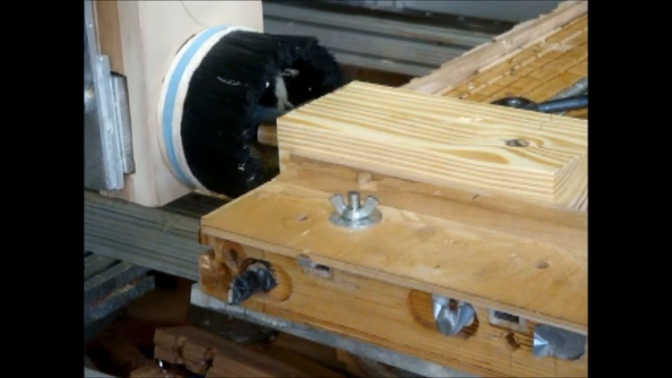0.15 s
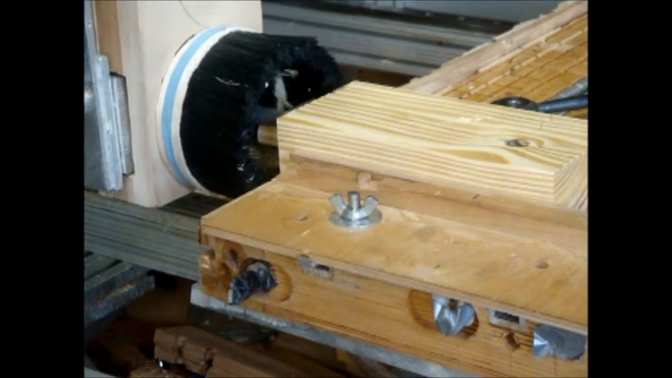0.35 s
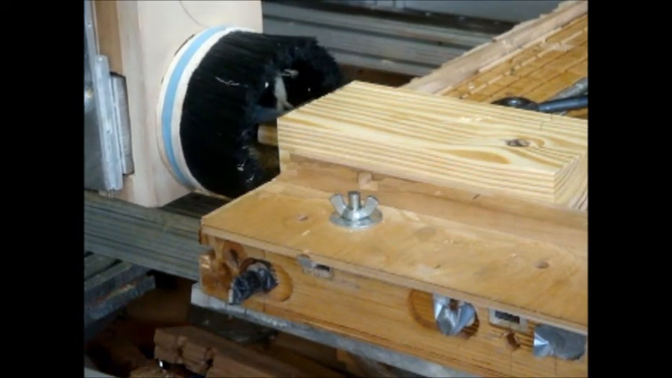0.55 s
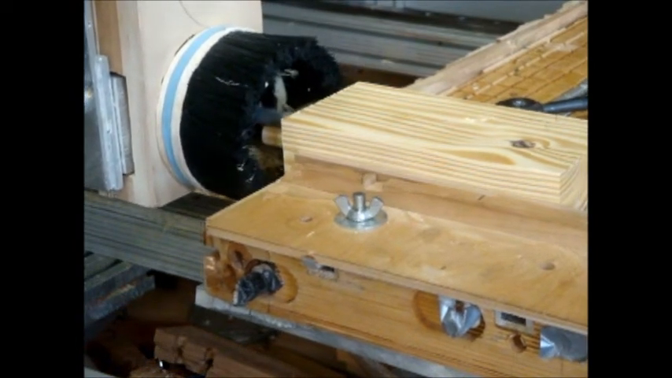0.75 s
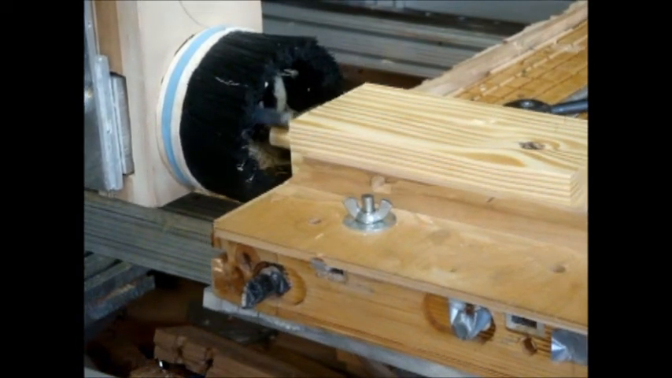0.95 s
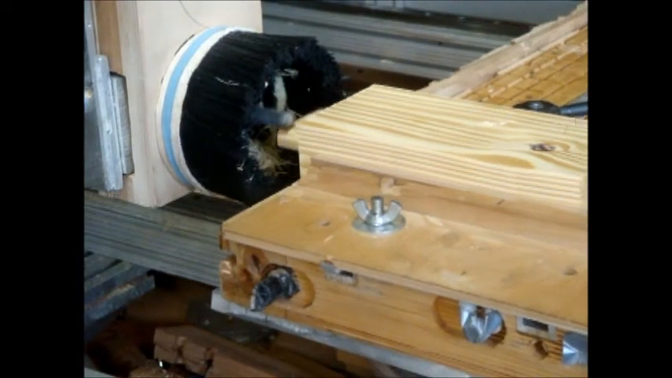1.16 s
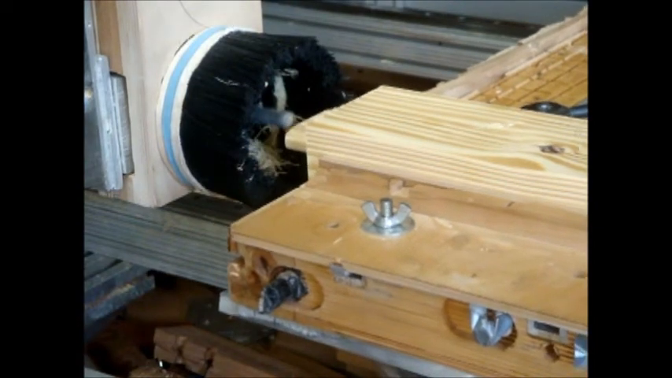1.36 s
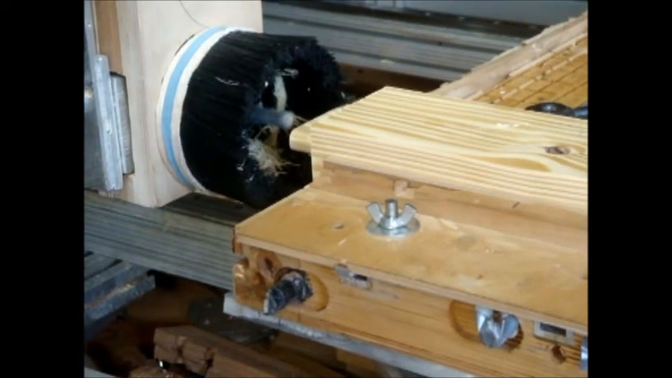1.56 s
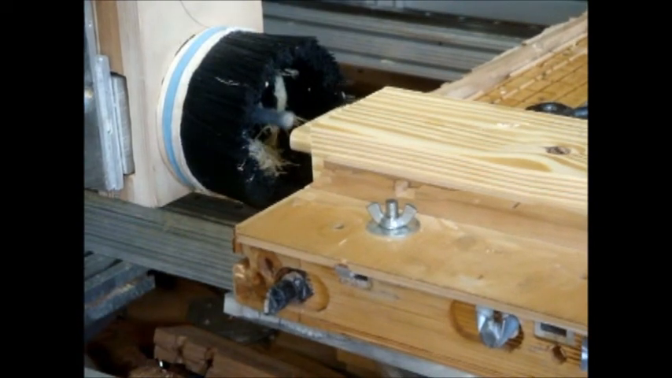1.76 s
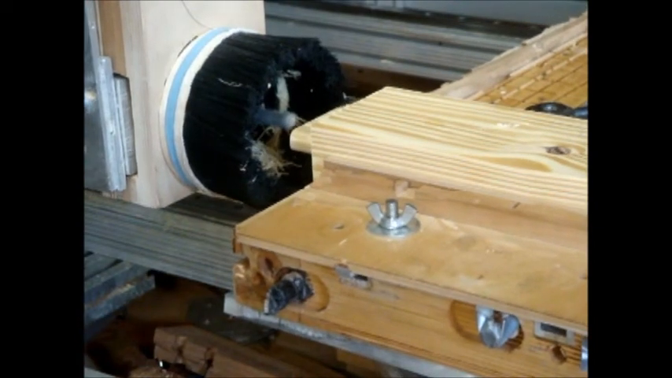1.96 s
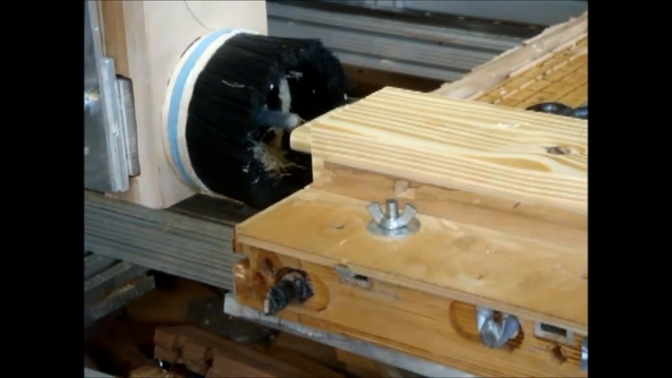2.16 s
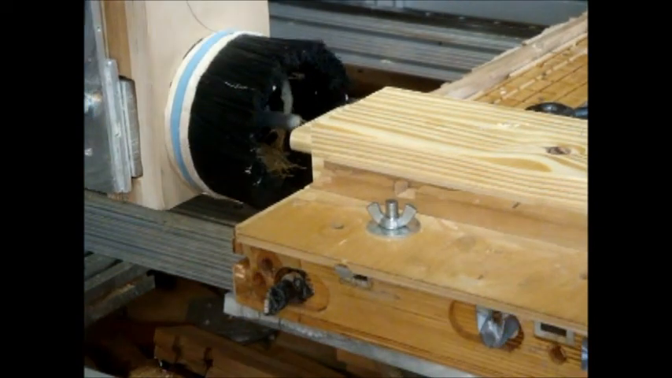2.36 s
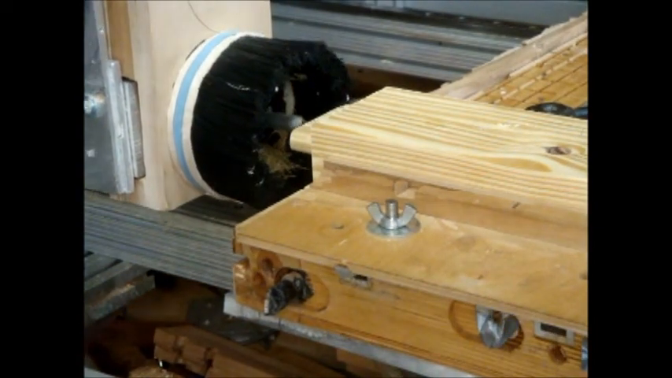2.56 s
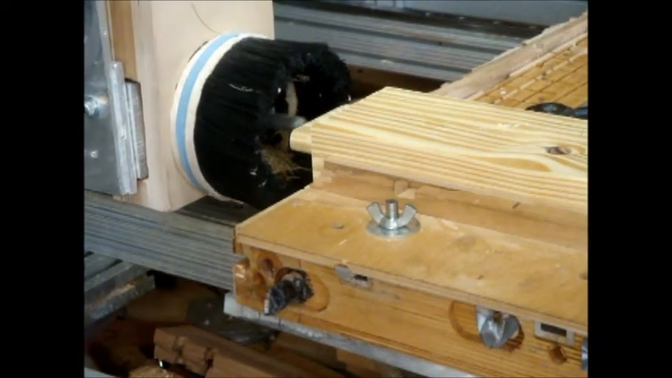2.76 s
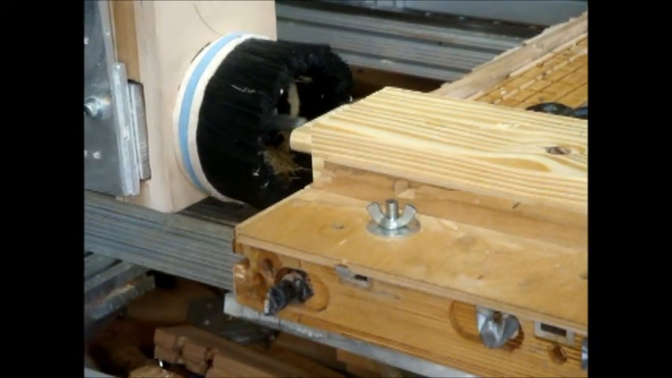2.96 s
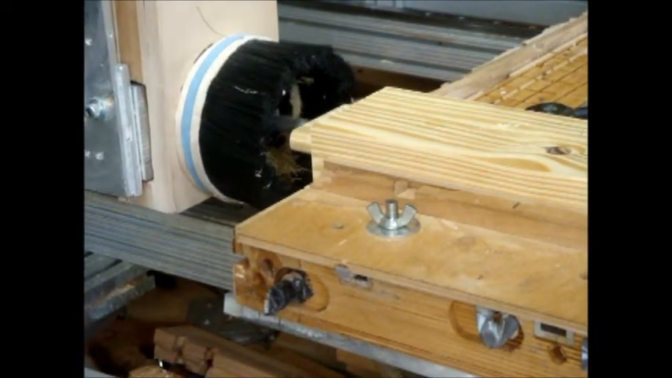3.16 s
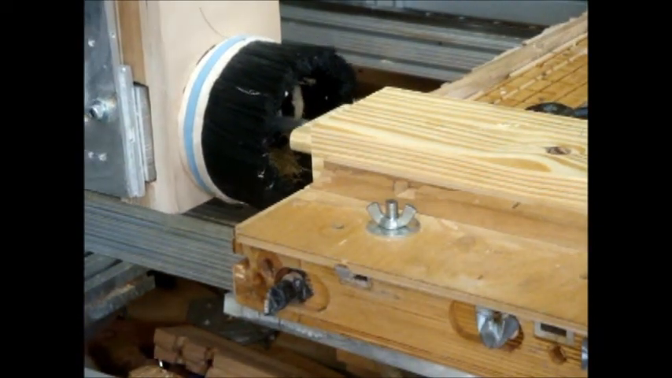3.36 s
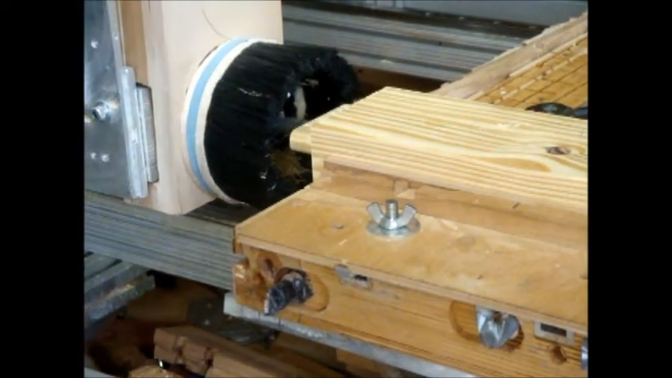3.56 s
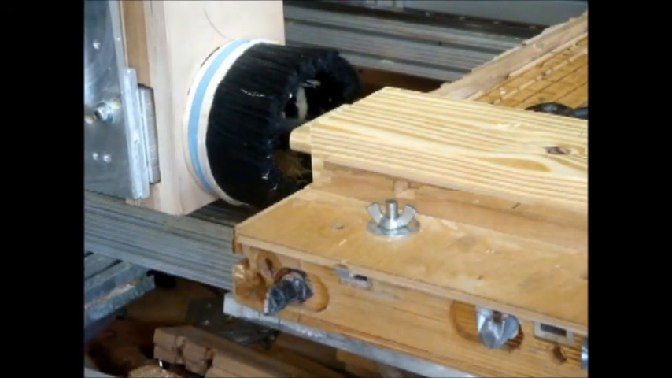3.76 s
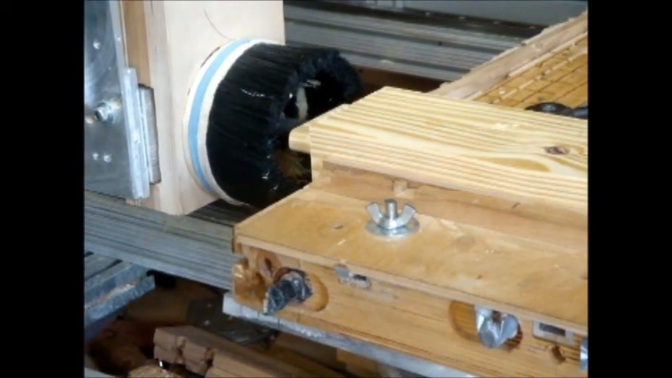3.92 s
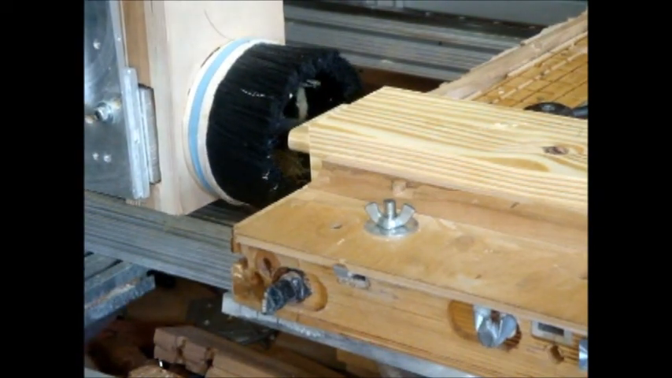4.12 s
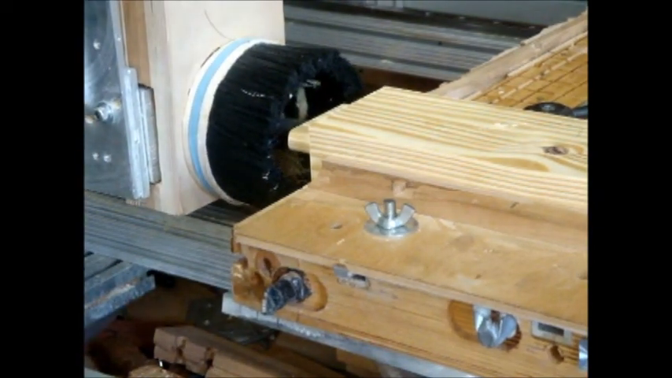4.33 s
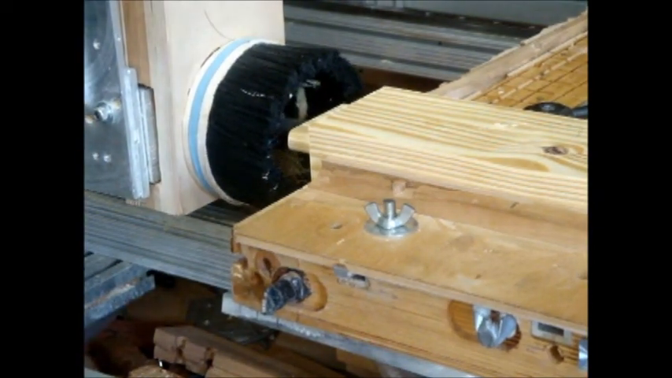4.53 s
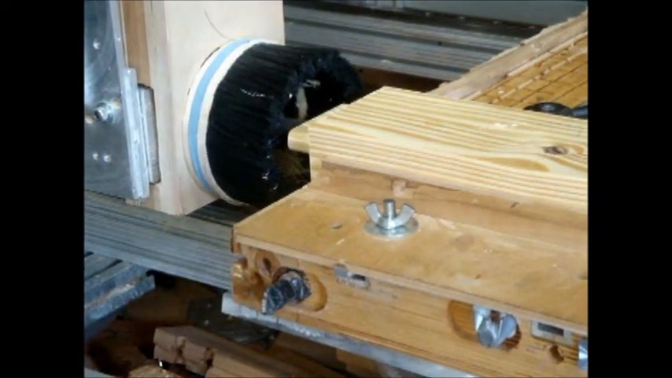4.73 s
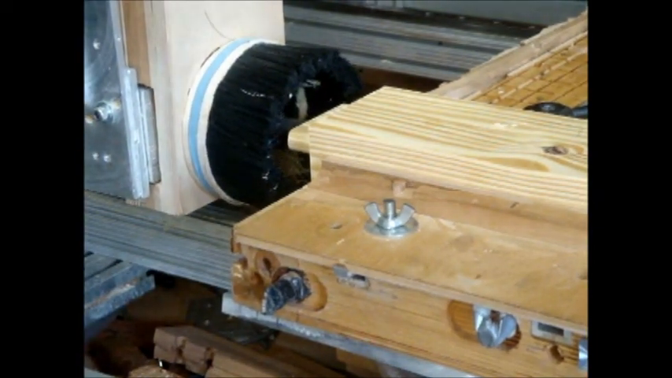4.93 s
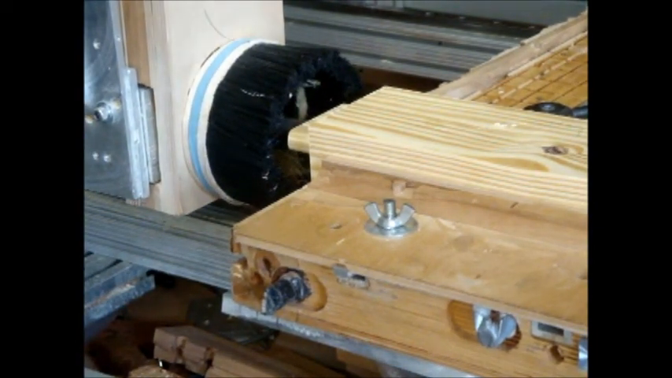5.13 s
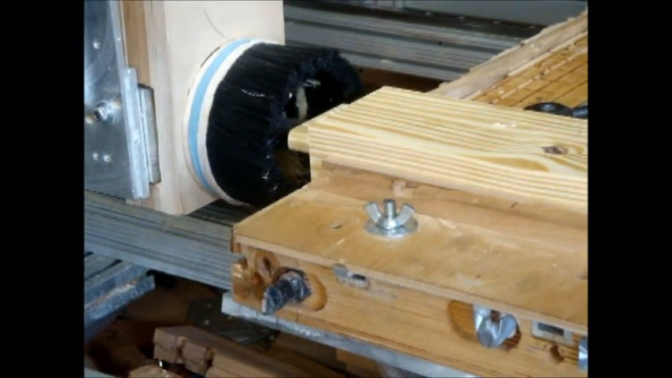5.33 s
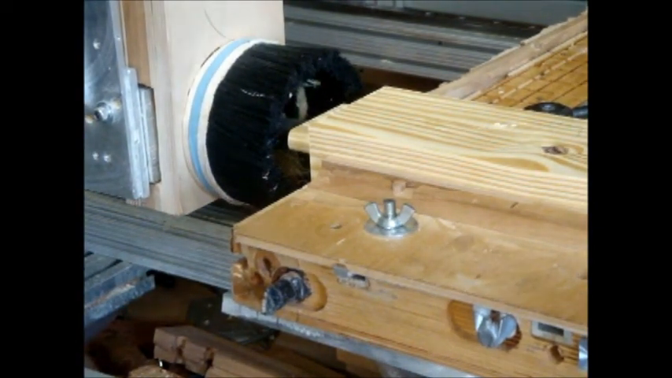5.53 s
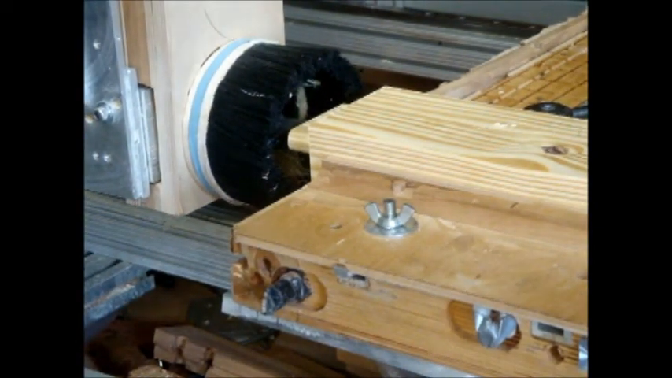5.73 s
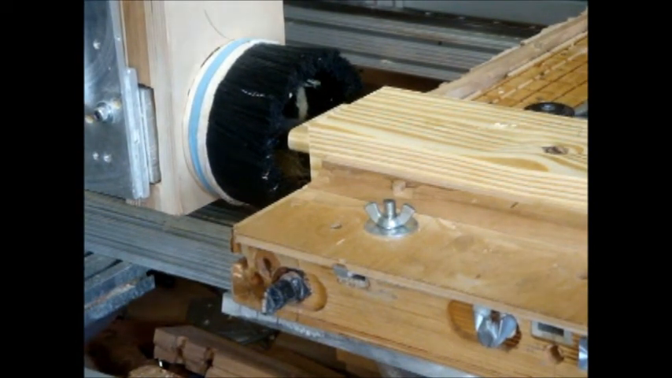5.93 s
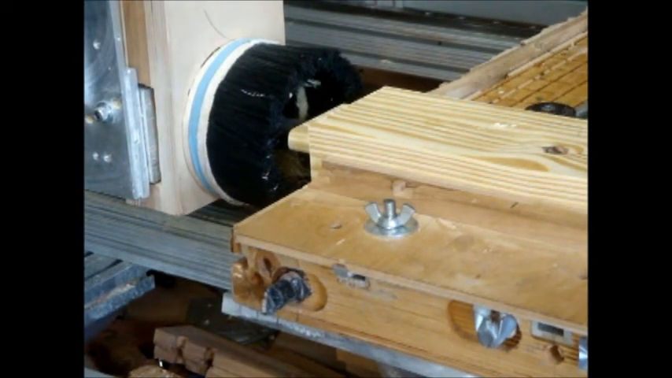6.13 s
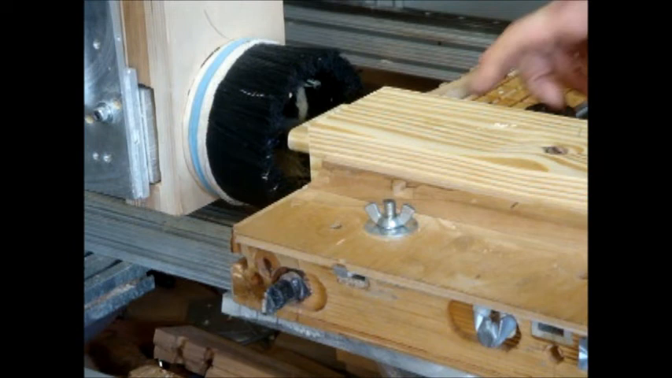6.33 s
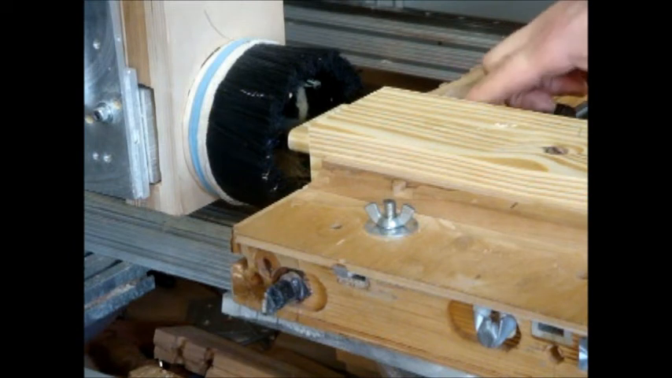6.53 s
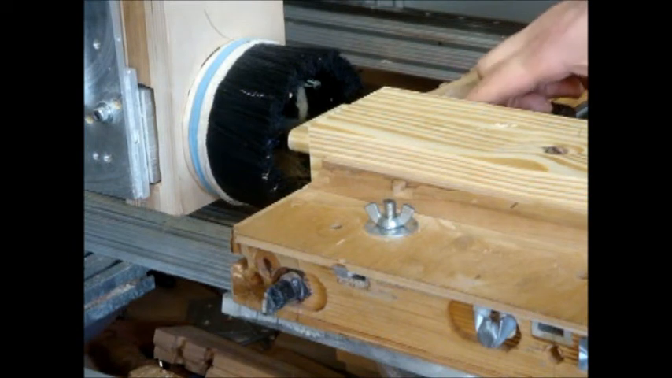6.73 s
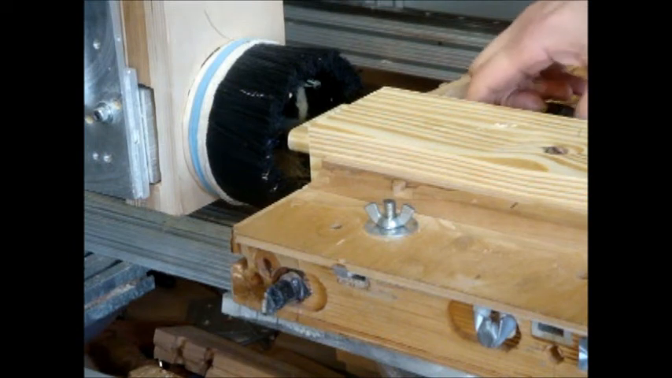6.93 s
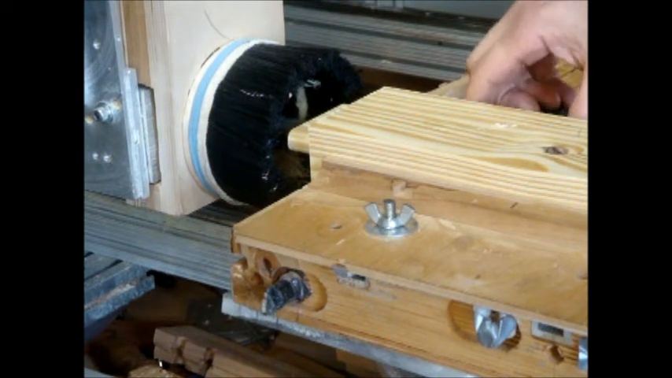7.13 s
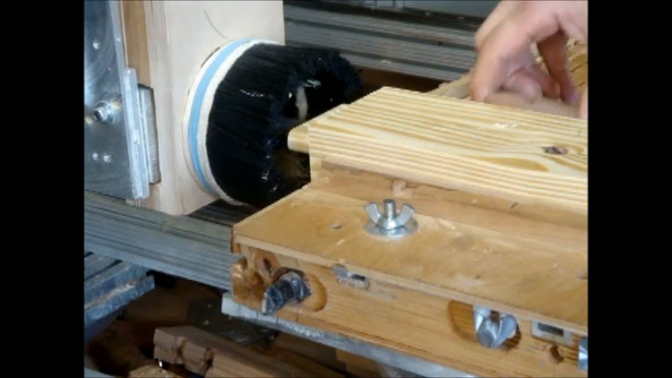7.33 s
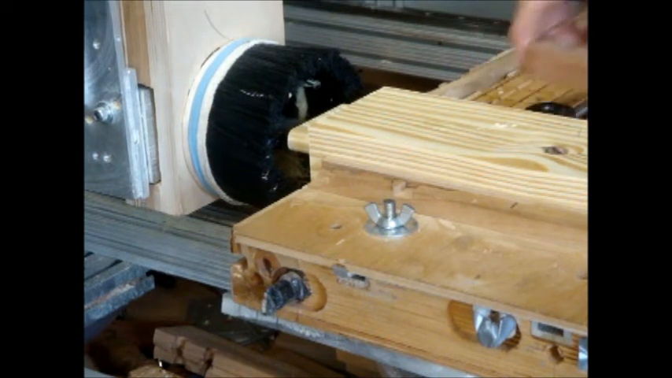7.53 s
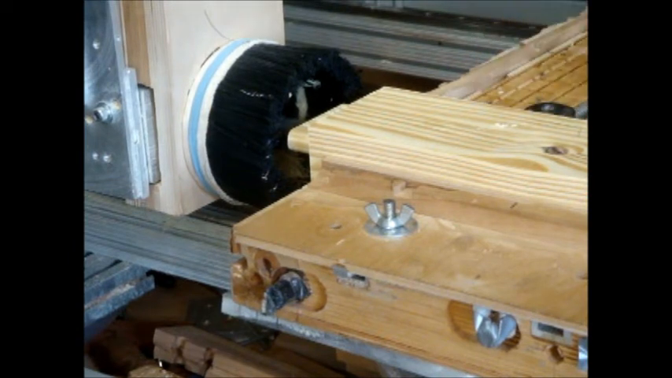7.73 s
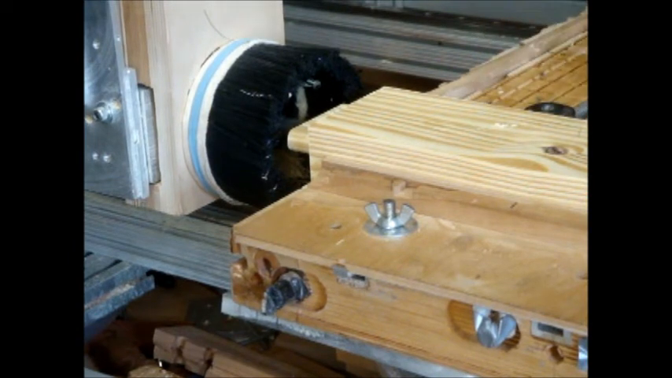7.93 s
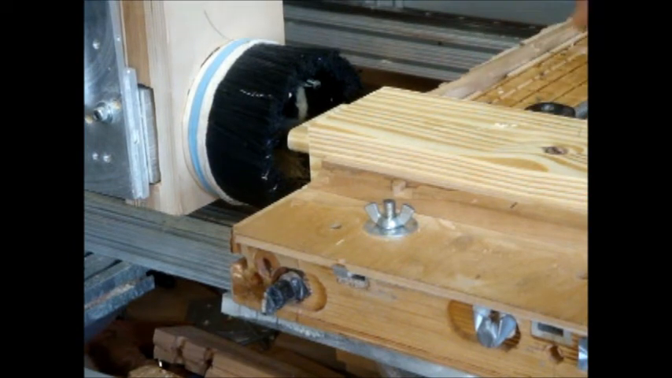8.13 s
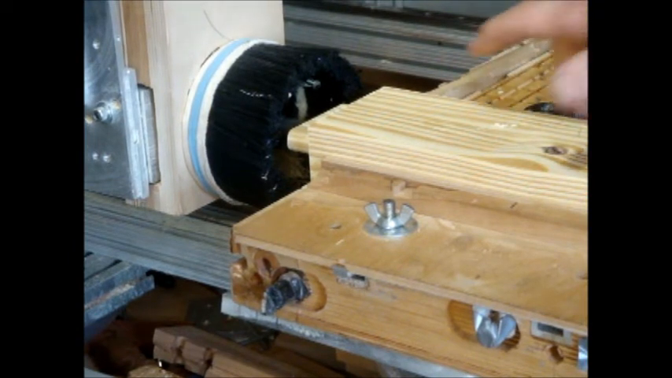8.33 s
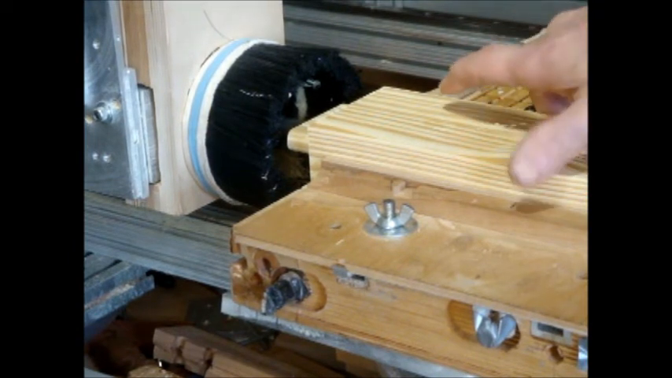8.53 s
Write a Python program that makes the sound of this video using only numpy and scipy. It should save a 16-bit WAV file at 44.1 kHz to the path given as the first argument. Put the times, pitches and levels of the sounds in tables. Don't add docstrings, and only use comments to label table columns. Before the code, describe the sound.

From 0 to 4.6 seconds a router spindle runs at full speed, its steady whine built on about 300 hertz with strong overtones near 900 and 1200 that swell and waver as the carriage moves. Around it a dust hose roars, broad and hollow with whistling pipe resonances, plus a raspy hiss near 5 kilohertz that eases around 3 seconds, and thin electrical whistles. A faint high bearing tone sings at 4.1. At 4.64 both machines are switched off: a blade tone near 2.2 kilohertz drops away by 5.2, while the spindle whine slides steadily down, overtones flaring through resonances and electrical tones converging near 5 kilohertz. The hose air weakens and dulls, uneven after 6.8. By 8 seconds the spindle is nearly stopped; a distant motor's hum and throbbing rattle, raised by automatic gain, remains. A very faint low thud falls at 8.13. Close, essentially mono workshop sound, ending at about 8.6.

```python
import sys
import numpy as np
from scipy import signal
from scipy.io import wavfile
from scipy.ndimage import uniform_filter1d

SR = 44100
rng = np.random.default_rng(int(sys.argv[2]) if len(sys.argv) > 2 else 0)


def bounce(signal):
    frames = np.transpose(np.atleast_2d(signal))
    limited = np.clip(frames, -1, 1)
    pcm = np.round(limited * 32767).astype(np.int16)
    wavfile.write(sys.argv[1], SR, pcm)


def volts(x):
    e = np.asarray(x, float) / 20
    return 10 ** e


N = 378378
TIME = np.arange(N) / SR
FRAMES, HOP = N // 512 + 5, 512
OFF_S = 4.639


def evened(x):
    return x / np.sqrt(np.mean(x ** 2) + 1e-20)


def columns(rows, t=TIME):
    s, *values = np.transpose(rows)
    return [np.interp(t, s, v) for v in values]


def wander(rate):
    knots = np.arange(0, N / SR + 1, 1 / rate)
    return np.interp(TIME, knots, rng.standard_normal(len(knots)))


def tone(turns, db):
    return np.sqrt(2) * volts(db) * np.sin(2 * np.pi * (turns + rng.random()))


def noise(points, patchy_db, modes=(), depth=1, dull_db=0):
    hz = np.fft.rfftfreq(2048, 1 / SR)
    real, imaginary, patches = rng.standard_normal((FRAMES, 1025, 3)).T
    patches = uniform_filter1d(patches, size=16, axis=0)
    patches = evened(uniform_filter1d(patches, size=8, axis=1))
    point_hz, point_db = np.transpose(points)
    shape_db = np.interp(np.log(hz + 1), np.log(point_hz), point_db)[:, None]
    lift = 0 * hz
    for f, width, db in modes:
        lift = lift + (volts(db) ** 2 - 1) / (1 + abs(2 * (hz - f) / width) ** 2.25)
    lift = lift[:, None]
    treble_loss_db = dull_db * np.log2(1 + hz / 2000)[:, None]
    size = volts(shape_db + patchy_db * patches - treble_loss_db)
    size = size * np.sqrt(np.maximum(1 + lift * depth, .01))
    x = signal.istft((real + 1j * imaginary) * size, nperseg=2048, noverlap=2048 - HOP)[1][:N]
    return x / np.sqrt(np.mean(volts(shape_db) ** 2 * (1 + lift))) / 55


def ringing(modes, hz, floor_db):
    power = volts(floor_db) ** 2
    for f, width, db in modes:
        power = power + volts(db) ** 2 / (1 + (2 * (hz[::64] - f) / width) ** 2) ** 2
    return np.interp(TIME, TIME[::64], np.sqrt(power))


def swelled(size, events, order, rise):
    for start, end, event_order, db in events:
        if round(event_order) == order:
            ramp = np.clip(np.minimum(TIME - start, end - TIME) / rise, 0, 1)
            size = np.maximum(size, volts(db) * ramp)
    return size


# time in seconds, speed in turns per second.
SPEED_RAMP = [
    (0, 300.8),
    (.8, 301.1),
    (1.6, 301.5),
    (4.639, 301.5),
    (8.58, 59.6),
]


def ramp_speed():
    return columns(SPEED_RAMP)[0]


# shaft order, level in dB, wavering in dB.
RUNNING_ORDERS = [(1, -38.5, 1.5), (2, -43, 5), (3, -38.5, 3), (4, -31.5, 4.5), (5, -44, 3), (6, -45, 3),
                  (7, -46, 3), (8, -46, 2), (9, -49, 3), (11, -42, 3), (12, -41, 3)]
COASTING_DB = [-4, -11, -5, -5, -5, -5, -6, -3]
# centre in Hz, width in Hz, level in dB.
BODY_MODES = [(133, 19, -42), (184, 18, -36), (252, 32, -33.5), (340, 44, -30), (366, 150, -30),
              (470, 66, -25), (643, 124, -27.5), (790, 250, -29), (920, 23, -20.5), (1140, 120, -29),
              (1250, 110, -35), (1340, 110, -33), (1670, 330, -29.5), (1916, 13, -40.2)]
# start in seconds, end in seconds, shaft order, level in dB.
SWELLS = [(0.502, 1.854, 1, -34), (1.9, 2.403, 1, -37), (-.2, .35, 2, -35.5), (.6, 1.25, 2, -35),
          (1.35, 1.65, 2, -34), (2.1, 2.45, 2, -30), (2.897, 3.15, 2, -38.5), (3.45, 3.75, 2, -31),
          (4.047, 4.5, 2, -32.5), (0.447, 1.694, 3, -28.5), (1.648, 3.756, 3, -24), (3.108, 3.735, 3, -20),
          (3.498, 4.6, 3, -27), (4.32, 4.91, 3, -23), (-.2, .75, 4, -27), (1.15, 1.5, 4, -26.5),
          (1.75, 2.406, 4, -28), (2.702, 3.2, 4, -29), (3.3, 3.95, 4, -27), (3.998, 4.544, 4, -24.5),
          (4.3, 4.95, 4, -30.5), (-.2, .4, 3, -37), (-.2, .75, 5, -33), (0.147, 1, 6, -38),
          (3.9, 4.4, 6, -28.5), (-.2, .95, 7, -33.5), (1, 1.5, 7, -36)]
# start in seconds, end in seconds, shaft order, level in dB.
CROSSINGS = [(4.76, 5.03, 1, -30), (5.1, 5.58, 1, -32), (5.6, 6.1, 1, -41), (6.2, 6.66, 1, -43.5),
             (6.8, 7.4, 1, -49), (7.3, 7.66, 1, -45.5), (5.52, 5.8, 2, -32), (5.94, 6.16, 2, -32),
             (6.22, 6.46, 2, -33), (6.48, 7.1, 2, -39), (7.3, 7.5, 3, -43), (7.48, 7.7, 3, -41),
             (5.12, 5.52, 3, -31), (5.76, 6.2, 3, -27.5), (6.8, 7.2, 3, -38), (5.76, 6.0, 4, -28.5),
             (5.9, 6.36, 4, -30.5), (6.4, 6.9, 4, -30), (6.8, 7.06, 4, -28.5), (7.2, 7.72, 4, -40),
             (4.78, 5.0, 5, -33), (5.05, 5.75, 5, -33.5), (5.76, 6.22, 5, -34), (6.4, 6.66, 5, -36),
             (6.7, 6.95, 5, -38), (7.08, 7.6, 5, -33), (7.5, 8.1, 5, -40), (5.74, 6.1, 6, -34),
             (5.98, 6.28, 6, -28), (6.2, 6.7, 6, -33), (6.75, 7.14, 6, -36.5), (7.18, 7.6, 6, -34.5),
             (7.5, 7.95, 6, -40), (6.5, 6.84, 7, -32.5), (6.8, 7.18, 7, -33.5), (7.3, 7.55, 7, -40),
             (7.78, 7.95, 7, -40), (5.95, 6.3, 8, -36), (6.58, 6.86, 8, -38), (6.95, 7.12, 8, -37),
             (7.2, 7.46, 8, -40)]


def shaft_orders(speed, turns, coasting):
    lost = 1 - speed / speed[0]
    running = {}
    for k, db, waver_db in RUNNING_ORDERS:
        running[round(k)] = (1 - coasting) * volts(db + waver_db * wander(4.03))
    out = sum(running[k] * tone(k * turns, 0) for k in (9, 11, 12))
    for k, db in enumerate(COASTING_DB, 1):
        sliding_db = db - 33 * lost ** 2 + 1.5 * wander(9)
        sliding = coasting * ringing(BODY_MODES, k * speed, floor_db=-54) * volts(sliding_db)
        size = swelled(running.get(k, 0) + sliding, SWELLS, order=k, rise=.19)
        size = swelled(size, CROSSINGS, order=k, rise=.077)
        out += size * tone(k * turns, .83 * wander(12))
    return out


# centre in Hz, width in Hz, level in dB.
HOUSING = [(1250, 600, -48), (1700, 300, -50), (2100, 600, -54), (3400, 330, -47), (6900, 500, -53),
           (7700, 500, -52), (9200, 500, -53)]
# start in
# seconds, end in seconds, shaft order, level in dB.
FLARES = [(-.2, .36, 9, -28), (.2, .9, 9, -35), (-.2, .9, 14, -43), (-.1, .35, 15, -44), (-.1, .6, 12, -37),
          (-.2, .85, 10, -36), (-.2, .45, 11, -36), (.6, 1.1, 11, -37), (1.05, 1.45, 10, -36),
          (2.55, 3.05, 10, -39), (4.66, 5.02, 23, -48), (4.8, 5.1, 24, -48), (-.2, .35, 19, -43),
          (-.2, .4, 16, -44), (.65, 1.05, 16, -42), (-.2, .7, 22, -47), (7.3, 7.6, 26, -42),
          (7.4, 7.6, 27, -44), (7.6, 7.8, 30, -38.5), (7.55, 7.8, 29, -46), (6.75, 7.05, 20, -45),
          (6.4, 6.7, 19, -47), (7, 7.2, 17, -45), (4.98, 5.24, 14, -39), (5.08, 5.65, 13, -39),
          (5.45, 5.85, 14, -37), (5.7, 6.5, 14, -42), (5.72, 6.08, 15, -36), (5.95, 6.5, 15, -41),
          (5.66, 6.05, 13, -40), (5.83, 6.06, 10, -45), (6.25, 6.6, 18, -39), (6.4, 6.85, 18, -41.5),
          (6.3, 6.9, 9, -44), (6.06, 6.52, 17, -40.5), (6.12, 6.4, 16, -45), (6.7, 7.16, 21, -41.5),
          (6.9, 7.32, 22, -42), (7, 7.38, 23, -40), (7.08, 7.42, 24, -42), (7.3, 7.55, 25, -46),
          (6.92, 7.26, 11, -41), (7.16, 7.4, 9, -39), (7.17, 7.38, 10, -43), (7.4, 7.62, 10, -38),
          (7.2, 7.5, 12, -43), (7.65, 7.95, 10, -43), (4.76, 5.2, 12, -41),
          (4.8, 5.35, 20, -47), (5.25, 5.7, 22, -48.5), (5.25, 5.65, 21, -50), (5.85, 6.3, 18, -47.5),
          (6.5, 7.05, 23, -49.5), (4.8, 5.3, 19, -51), (5.9, 6.3, 13, -46.5), (4.82, 5.7, 15, -47),
          (6.3, 6.7, 15, -46), (4.8, 5.2, 10, -43), (6.3, 6.7, 22, -49), (4.8, 5.6, 12, -43),
          (7.3, 7.6, 14, -45), (7.2, 7.6, 13, -46)]


def high_orders(speed, turns, coasting):
    lost = 1 - speed / speed[0]
    fading_db = -4 * lost ** 2 - 55 * lost ** 6
    out = 0
    for k in range(9, 50):
        hz = k * speed[::64]
        near = sum(volts(db) / (1 + (2 * (hz - f) / width) ** 2) for f, width, db in HOUSING)
        near = np.interp(TIME, TIME[::64], near * (hz < 10500))
        size = coasting * near * volts(fading_db + 3 * wander(5))
        size = swelled(size, FLARES, order=k, rise=.1)
        out += size * tone(k * turns, 2.5 + 1.8 * wander(30))
    return out


# frequency in Hz, density in dB per Hz.
RASP = [(4300, -50), (4800, -8.5), (5500, 0), (6200, -35)]


def flute_rasp(turns, coasting):
    parked = np.clip((TIME - 3.05) / .069, 0, 1)
    rasp = evened(noise(RASP, 1.5) * np.exp(.8 * np.cos(2 * np.pi * turns)))
    return volts(-33.5 - 2.5 * parked - 6.3 * coasting) * rasp


# frequency in Hz, density in dB per Hz.
WIND = [(88, -36), (150, -32), (429, -4), (539, -3), (677, 5.5), (793, 2), (962, 1), (1970, -2.5),
        (3460, -2), (4340, -6), (5270, -5), (5650, -5), (9900, -12.5), (12900, -48.5), (21800, -120)]


def spindle_air(speed, turns, coasting):
    chop = 1 + .11 * np.cos(2 * np.pi * turns)
    air_db = -27 + 2.5 * coasting - 7 * (1 - speed / speed[0])
    return volts(air_db) * chop * evened(noise(WIND, patchy_db=1.0))


# time in seconds, level in dB.
BEARING = [
    (4.07, -70),
    (4.095, -34),
    (4.16, -39.5),
    (4.32, -38.5),
    (4.46, -41.5),
    (4.64, -40),
    (4.78, -44),
    (4.85, -70),
]


def bearing(turns):
    return tone(21.977 * turns, columns(BEARING)[0] + 1.5 * wander(20))


def spindle():
    coasting = np.clip((TIME - OFF_S) / .161, 0, 1)
    speed = ramp_speed() + .65 * coasting
    turns = np.cumsum(speed) / SR
    lines = shaft_orders(speed, turns, coasting) + high_orders(speed, turns, coasting)
    air = flute_rasp(turns, coasting) + spindle_air(speed, turns, coasting)
    return lines + air + bearing(turns)


# field multiple, running level in dB, coasting level over the modes in dB.
SIDEBANDS = [(1, -49, -0.5), (5, -43.5, -4), (-1, -50, 0.2), (-5, -52, 5.5)]
# centre in Hz, width in Hz, level in dB.
SHELL_MODES = [(3838, 119, -42.7), (4040, 100, -46), (4259, 112, -47.5), (4658, 35, -43.3), (4783, 69, -42),
               (4854, 29, -37), (4891, 60, -40.5),(5102, 62, -36.5), (5168, 60, -32), (5205, 20, -36),
               (5265, 50, -35), (5346, 60, -34.5), (5520, 150, -31.5), (5940, 190, -28.5),
               (6250, 150, -31.5)]
# carrier multiple, field multiple, running level in dB, coasting level in dB.
FAINT_TONES = [(1.5, -1, -52, -52), (1.5, -2, -46.5, -62), (1, 7, -66, -58), (1.5, -5, -66, -50),
               (1.5, -7, -52, -55), (1.5, -11, -66, -54), (1, -3, -62, -50), (2, -1, -57, -60),
               (2, -4, -57, -62)]
# start in seconds, end in seconds, field multiple, level in dB.
SINGING = [(4.7, 5.8, -2, -48.5), (6.1, 6.65, -5, -42), (6.85, 7.4, -5, -43), (7.2, 8.05, -5, -48),
           (5.7, 6.3, -7, -43), (7.95, 8.6, 7, -43), (6.85, 7.6, 7, -51)]
# frequency in
# Hz, level in dB.
STEADY_TONES = [(2228, -38.5), (5383, -53), (7914, -55.5), (9911, -59)]


def inverter():
    carrier_hz = 4997.5
    running = np.clip((OFF_S - TIME) / .092, 0, 1)
    speed = ramp_speed()
    field = np.cumsum(speed + .5 * running + .3 * (1 - running)) / SR
    out = 0
    for k, run_db, coast_db in SIDEBANDS:
        k = round(k)
        sliding = volts(coast_db) * ringing(SHELL_MODES, carrier_hz + k * speed, floor_db=-56)
        size = running * volts(run_db + wander(2.2)) + (1 - running) * sliding
        out += size * tone(carrier_hz * TIME + k * field, 1.5 * wander(30))
    for multiple, k, run_db, coast_db in FAINT_TONES:
        db = coast_db + running * (run_db - coast_db) + 2.1 * wander(2.6)
        size = swelled(volts(db), SINGING, order=k, rise=.12)
        out += size * tone(multiple * carrier_hz * TIME + k * field, -.3)
    steady = sum(tone(hz * TIME, db + 4 * wander(3.7)) for hz, db in STEADY_TONES)
    return out + running * steady


# frequency in Hz, density in dB per Hz.
ROAR = [(59, -66.5), (100, -46), (242, -21.5), (293, -12), (377, -15), (829, -5.5), (895, -6.5),
        (985, -5.5), (1170, -1.5), (1370, -4.5), (1860, -3), (2010, -10), (3010, -6.5), (4250, -10.5),
        (9900, -26), (12900, -58.5), (21800, -120)]
# centre in Hz, width in Hz, lift over the roar in dB.
HOSE_MODES = [(556, 55, 8), (762, 67, 5), (1111, 36, 7.5), (1496, 32, 2), (1859, 25, 10), (2229, 45, 13),
              (2610, 39, 7), (2750, 45, 5.5), (2952, 48, 12), (2994, 48, 12.5), (3256, 100, 10),
              (3650, 43, 9), (3880, 71, 5), (4400, 220, -2.5)]
# time in seconds, roar level in dB.
FLOW = [(0, -18), (1, -16.5), (2.2, -16), (3, -16), (3.5, -16.5), (4.65, -16.5), (5.2, -20.5), (5.9, -23),
        (6.8, -32), (7.5, -27), (8.2, -36), (8.58, -58)]
# time in seconds, depth from 0 to 1.
PIPE_DEPTH = [(0, 0.97), (.6, 1), (1.3, 0.95), (1.7, 0.99), (2.2, 1), (2.7, 0.85), (3.4, 0.98), (3.9, 1),
              (4.4, 0.9), (5, 1.0), (5.5, 1), (5.9, 0.64), (6.3, 0.76), (6.8, 0.49)]


def hose_roar():
    roar_db, = columns(FLOW)
    depth, = columns(PIPE_DEPTH)
    frame_at = np.arange(FRAMES) * HOP
    depth = np.interp(frame_at, np.arange(N), np.clip(depth, 0, 2))
    dull_db = np.interp(frame_at, np.arange(N), .45 * (roar_db[0] - roar_db))
    roar = noise(ROAR, 1.1, HOSE_MODES, depth, dull_db)
    return volts(roar_db + .28 * wander(14)) * roar / np.std(roar[:4 * SR])


# time in seconds, frequency in Hz, level in dB.
ROTOR = [
    (4.75, 251.6, -34),
    (4.9, 238, -47),
    (5.038, 219, -38.5),
    (5.244, 197.6, -47),
    (5.496, 179, -50),
    (5.75, 159.5, -54),
    (6.418, 122, -54.5),
    (6.6, 115.6, -74),
]
# time in seconds, frequency in Hz, level in dB.
BLADES = [
    (4.6, 2229, -74),
    (4.66, 2260, -29),
    (4.75, 2050, -35),
    (4.86, 2006, -31),
    (5, 1670, -35),
    (5.2, 1650, -70),
]


def vacuum():
    hz, db = columns(ROTOR)
    heard = np.clip(np.minimum(TIME - ROTOR[0][0], ROTOR[-1][0] - TIME) / .06, 0, 1)
    rotor = heard * tone(np.cumsum(hz) / SR, db)
    blade_hz, blade_db = columns(BLADES)
    return hose_roar() + rotor + tone(np.cumsum(blade_hz) / SR, blade_db)


# frequency in Hz, density in dB per Hz.
RATTLE = [(15, -62.5), (25, -39), (109, -44), (144, -25.5), (167, -15), (269, -13.5), (305, -5),
          (456, -12.5), (771, -17), (942, -3), (1630, -10.5), (1850, -14.5), (5160, -9), (6310, -11.5),
          (9900, -11.5), (12900, -41.5), (21800, -120)]
# centre in Hz, width in Hz, lift in dB.
CASING = [(2565, 56, 11), (3630, 270, 7.5), (9040, 540, -12.5), (9760, 220, 5.5)]
# frequency in Hz, level in dB.
HUM = [(59.2, -66), (177.6, -46.5), (236.9, -50), (296, -51), (323, -49), (409.5, -49.5), (440.9, -43.5),
       (469.2, -44.5), (499.8, -43), (587.1, -45), (645.7, -44.5), (704.9, -42.5), (851, -41.5), (938, -43),
       (968.9, -40.5), (1027.5, -44), (1056.5, -39.5), (1174.3, -43.5), (1258, -48), (1410, -48.5),
       (1528, -47.5), (1731.5, -48), (1771, -51), (3418, -48)]


def distant_motor(gain_db):
    shaft = 2 * np.pi * 29.36 * TIME
    throb = 1 + .22 * np.cos(shaft) + .33 * np.cos(2 * shaft)
    rattle = volts(-27) * throb * evened(noise(RATTLE, 1.4, CASING))
    hum = sum(tone(hz * TIME, db + .8 * wander(3)) for hz, db in HUM)
    cycles = 120.36 * TIME
    lag = 1.96 * (TIME - 6.82)
    buzz = volts(-62.5 + .4 * gain_db) * np.sin(2 * np.pi * cycles)
    buzz += volts(-58 + gain_db) * np.sin(2 * np.pi * (cycles - lag))
    return np.sqrt(2) * buzz + volts(gain_db) * (rattle + hum)


# start in seconds, level in dB, frequency in Hz, length in seconds.
THUD = (8.13, -50, 55, .03)


def bench_thud():
    start, db, hz, length = THUD
    u = np.clip((TIME - start) / length, 0, 1)
    return volts(db) * np.sin(np.pi * u) ** 2 * np.sin(2 * np.pi * hz * length * u)


def shop():
    rise_db, rise_s = 12.5, .99
    gain_db = -15 + rise_db * (1 - np.exp(-np.maximum(TIME - OFF_S, 0) / rise_s))
    return distant_motor(gain_db) + bench_thud()


def scene():
    return np.tile(spindle() + inverter() + vacuum() + shop(), (2, 1))


def band_limit(x):
    return signal.sosfilt(signal.butter(12, 11210, fs=SR, output="sos"), x)


# time in seconds, centre in Hz.
PARTINGS = [(.655, 4700), (1.262, 5800), (2.095, 5800), (4.095, 7600), (7.135, 8300), (7.88, 9000)]


def record(dry):
    hz, t, z = signal.stft(np.tanh(dry[0] / 1.562) * 1.647, SR, nperseg=256, noverlap=192)
    hz = hz[:, None]
    cells = rng.random((len(t) // 3 + 1, 43))
    pressure = np.interp(t[::3], TIME, volts(3 * wander(8)))
    start = cells[:len(pressure)] < .037 * pressure[:, None]
    holes = uniform_filter1d(1. * start, size=2, axis=0) > 0
    holes = np.repeat(np.repeat(holes, 3, axis=0), 3, axis=1).T[:, :len(t)]
    z = z * volts(-28. * (holes * (hz > 5000)))
    parted = sum((abs(t - s) < .018) * (abs(hz - f) < 650) for s, f in PARTINGS)
    side = 1j * volts(-7.0) * parted * z
    mid, side = signal.istft(np.array([z, side]), SR, nperseg=256, noverlap=192)[1][:, :N]
    edge = signal.firwin(801, 10060, window=("kaiser", 10), fs=SR)
    mix = signal.oaconvolve(np.array([mid + side, mid - side]), edge[None], "same")
    return band_limit(mix)


dry = scene()
out = record(dry)
bounce(out)
```